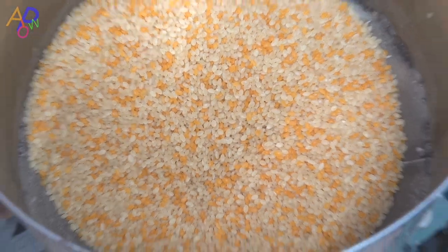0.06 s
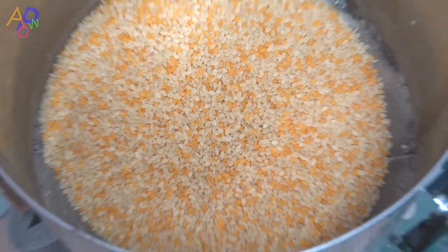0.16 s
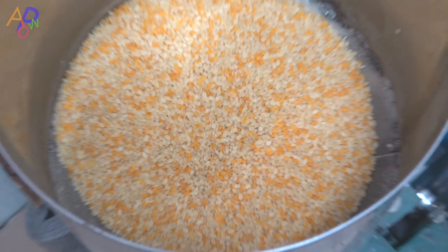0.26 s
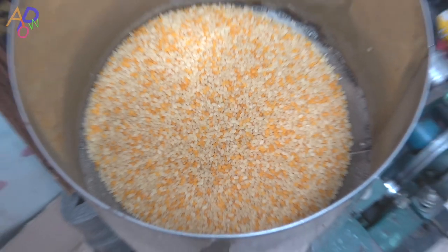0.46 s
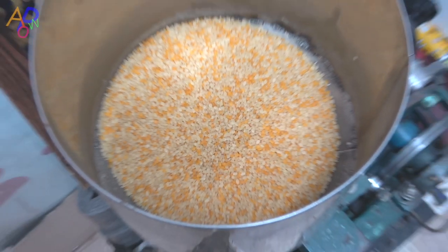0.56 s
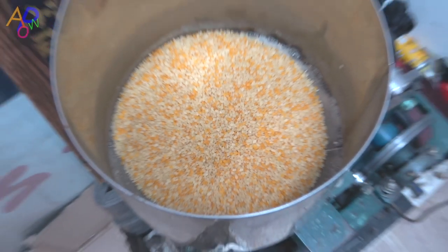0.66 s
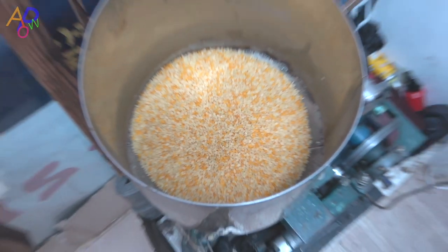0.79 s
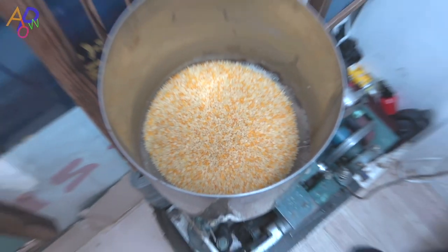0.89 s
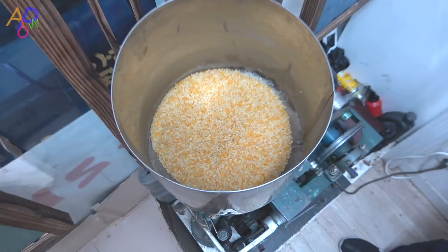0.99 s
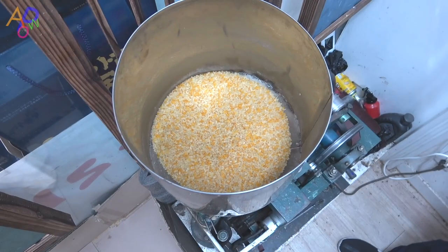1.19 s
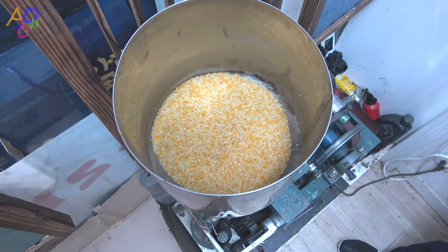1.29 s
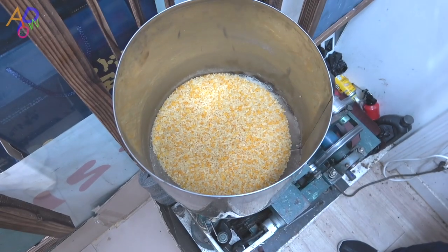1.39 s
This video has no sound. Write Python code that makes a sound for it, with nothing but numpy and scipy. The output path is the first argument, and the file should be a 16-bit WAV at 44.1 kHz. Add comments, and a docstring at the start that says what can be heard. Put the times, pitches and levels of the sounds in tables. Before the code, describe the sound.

In a workshop, something metal bangs against a grain-filled steel hopper, overloading the nearby microphone. The hopper settles with quick thuds and rattles, then a latch clicks, while a motor hums and loose parts tick faintly.

```python
"""Bang on a grain hopper

A steel hopper full of grain stands on a humming electric machine in a workshop. Something metal
bangs against it: the frame booms, the sheet rings and the microphone overloads. The hopper bumps
as it settles, a fitting is tapped and a latch clacks, with faint ticks of loose parts between."""
import sys
import numpy as np
from scipy import signal
from scipy.fft import rfft, irfft, next_fast_len
from scipy.io import wavfile

SR = 44100
rng = np.random.default_rng(int(sys.argv[2]) if len(sys.argv) > 2 else 0)


def store_pcm(level_fs):
    """Save levels as 16-bit WAV."""
    pcm = np.round(np.clip(level_fs, -1, 1) * 32767).astype(np.int16)
    wavfile.write(sys.argv[1], SR, np.atleast_2d(pcm).T)


N = 63945
TIME = np.arange(N) / SR

# Frame modes: pitch_hz, level_db, t60_s
FRAME_MODES = [(88.4, -1, 0.44), (146.36, -8, 0.62), (171.2, -6, 0.23), (199.3, -3, 0.19), (218, -13, 0.66),
               (270.8, -3.5, 0.57), (322.2, -5.5, 0.42), (494.8, -10.5, 0.17), (643.4, -12.5, 0.15)]
# Steel sheet modes: pitch_hz, level_db, t60_s
SHEET_MODES = [(772, -9, 0.32), (872, -8, 0.24), (1157, -6, 0.42), (1497, 1, 0.24), (1680, -10, 0.22),
               (2067, -7, 0.28), (2282, -5, 0.22), (2422, 1, 0.21), (2643, -10, 0.3), (3122, -10, 0.26),
               (3700, -7, 0.2), (4016, -1, 0.2), (4400, -8, 0.2)]
# Hit and rebound on the sheet: start_s, level_db
SHEET_HITS = [(0.2135, -27.5), (0.259, -20.5)]
# Metal-on-metal contact spectrum: freq_hz, density_db
METAL_SPECTRUM = [(300, 0.5), (900, -1.5), (1150, -17), (1500, -6.5), (2300, 1), (3200, 1.5), (3800, 6.5),
                  (5100, -13.5), (6000, -10), (7500, -12.5), (11000, -22), (16000, -19)]


def bang(start_s=0.2115):
    """Metal cracks against the hopper; the frame booms and the sheet rings fully on the rebound."""
    crack = from_db(-2) * noise(METAL_SPECTRUM) * burst(start_s, rise_s=0.0077, t60_s=0.02)
    boom = ring(FRAME_MODES, [(start_s + 0.001513, -3)])
    sheet = ring(SHEET_MODES, SHEET_HITS)
    return crack + boom + sheet + from_db(-5.5) * crash(start_s, rise_s=0.015)


# Dense hopper and room resonances: freq_hz, density_db
CRASH_SPECTRUM = [(40, -32), (90, -3), (280, 4.5), (420, -9.5), (750, -11), (1100, -18.5), (2300, -14.5),
                  (3000, -17.5), (4100, -16), (5500, -25.5), (9000, -32), (16000, -33.5)]
# Their decay times: freq_hz, t60_s
CRASH_DECAY = [(100, 0.82), (300, 0.53), (1200, 0.31), (4000, 0.33), (12000, 0.3)]


def crash(start_s, rise_s):
    """Countless close resonances of hopper and room; the bass lasts longest."""
    rest, out = noise(CRASH_SPECTRUM), 0
    for hz in np.geomspace(150, 12000, 7):
        band = signal.sosfilt(signal.butter(1, hz, fs=SR, output="sos"), rest)
        rest = rest - band
        out += band * burst(start_s, rise_s, at_hz(CRASH_DECAY, hz))
    return out + rest * burst(start_s, rise_s, CRASH_DECAY[-1][1])


# Bumps as the hopper settles, the last one the thud of the latch: start_s, thud_db, frame_db, rattle_db
BUMPS = [(0.26, -4.5, -20.5, -20), (0.323, -32, -15, -19.5), (0.3736, -11.5, -25, -23),
         (0.432, -19, -26, -24.5), (0.679, -22, -33.5, -32), (0.964, -27.5, -34.5, -42)]
# Loaded hopper modes: pitch_hz, level_db, t60_s
HOPPER_MODES = [(172.8, -9, 0.32), (240, 1.5, 0.13), (269.6, -0.5, 0.14), (332, -6.5, 0.075)]
# Dull contact spectrum: freq_hz, density_db
THUD_SPECTRUM = [(40, -38), (90, -16), (170, -3), (260, 1), (400, -10), (650, -14.5), (1300, -43),
                 (6000, -70)]
# Rattle spectrum: freq_hz, density_db
RATTLE_SPECTRUM = [(250, 1), (650, 0.5), (900, -7.5), (1250, 3.5), (1600, -11.5), (3500, -18), (12000, -45)]


def bumps():
    """The hopper settles: each bump thuds, rattles briefly and stirs the frame again; the last bump is the
    latch thudding home."""
    out = ring(FRAME_MODES, [(start_s, db) for start_s, _, db, _ in BUMPS])
    out += ring(HOPPER_MODES, [(start_s, db) for start_s, db, _, _ in BUMPS])
    for start_s, thud_db, _, rattle_db in BUMPS:
        thud = noise(THUD_SPECTRUM) * burst(start_s, rise_s=0.0031, t60_s=0.11)
        rattle = noise(RATTLE_SPECTRUM) * burst(start_s, rise_s=0.005, t60_s=0.05)
        out = out + from_db(thud_db - 1) * thud + from_db(rattle_db) * rattle
    return out


RING_LAG_S = 0.0025
# Latch modes: pitch_hz, level_db, t60_s
LATCH_MODES = [(905, -2.5, 0.045), (2125, -10.5, 0.1), (2282, -10, 0.07), (2557, -9.5, 0.06),
               (3682, -3.5, 0.05), (3962, 1, 0.048)]


def latch(start_s=0.96, snap_db=-19.5, ring_db=-18.5):
    """A small steel latch snaps home and rings briefly."""
    contact = snap(METAL_SPECTRUM, start_s, snap_db)
    return contact + ring(LATCH_MODES, [(start_s + RING_LAG_S, ring_db)])


# Fitting modes: pitch_hz, level_db, t60_s
FITTING_MODES = [(514, -1.5, 0.06), (617, 0, 0.1), (2621, -6.5, 0.07), (3578, 1.5, 0.06), (3950, 0, 0.06),
                 (4650, -11, 0.05)]


def fitting_tap(start_s=0.498, snap_db=-26.5, ring_db=-27.5):
    """A light tap sets a metal fitting ringing, short and hollow."""
    contact = snap(METAL_SPECTRUM, start_s, snap_db)
    return contact + ring(FITTING_MODES, [(start_s + RING_LAG_S, ring_db)])


# Loose part contacts: start_s, level_db
TICKS = [(0.165, -37.5), (0.3693, -25), (0.4245, -35.5), (0.4505, -43), (0.516, -35), (0.521, -37),
         (0.955, -30.5), (1.097, -46), (1.298, -40.5)]
# Tick spectrum: freq_hz, density_db
TICK_SPECTRUM = [(500, 9), (2500, 4.5), (4400, 7), (6000, -8), (9000, -10.5), (16000, -19)]


def ticks():
    """Loose parts touch: short, bright and without pitch."""
    return sum(snap(TICK_SPECTRUM, start_s, db) for start_s, db in TICKS)


# Motor and mains hum lines: pitch_hz, level_db
HUM_LINES = [(119.6, -35.5), (178, -48), (240, -40), (270, -46), (360.3, -43), (479, -49), (640, -54.5)]
# Running noise spectrum: freq_hz, density_db
WHIR_SPECTRUM = [(25, -40), (45, -18), (68, -7), (100, -3), (150, -3.5), (260, -6), (330, -8), (420, -9),
                 (620, -14), (950, -22.5), (1700, -25), (2150, -21), (2500, -21.5), (3300, -30.5),
                 (4100, -22), (5200, -41), (8000, -42), (10500, -51), (16000, -52)]


def machine(waver_db=1.2, whine_hz=2772, whine_width_hz=51):
    """Wavering motor and mains hum, a narrow bearing whine and broad running noise."""
    hum = 0
    for hz, db in HUM_LINES:
        amplitude = np.sqrt(2) * from_db(db + waver_db * drift(rate_hz=4.8))
        hum += amplitude * np.sin(2 * np.pi * (hz * TIME + rng.random()))
    phase = 2 * np.pi * whine_hz * TIME
    whine = drift(whine_width_hz) * np.sin(phase) + drift(whine_width_hz) * np.cos(phase)
    return hum + from_db(-48.5) * whine + from_db(-34.5) * noise(WHIR_SPECTRUM)


# Rumble envelope: time_s, level_db
RUMBLE_LEVELS = [(0, -46), (0.2, -41), (0.6, -40), (0.9, -51.5), (0.98, -33), (1.1, -47), (1.3, -34),
                 (1.45, -52)]
# Rumble spectrum: freq_hz, density_db
RUMBLE_SPECTRUM = [(25, -30), (48, -17), (68, -2.5), (90, -11), (140, -13), (400, -85)]


def rumble():
    """A low rumble comes and goes under the hum."""
    level_db = np.interp(TIME, *np.transpose(RUMBLE_LEVELS))
    return from_db(level_db) * noise(RUMBLE_SPECTRUM)


def ring(modes, blows, uneven_db=2.0):
    """Blows (start_s, level_db) strike every damped mode, each with slightly uneven strength."""
    start_s, blow_db = np.transpose(blows)
    out = np.zeros(N)
    for k, (hz, mode_db, t60_s) in enumerate(modes):
        strength = from_db(blow_db + mode_db + uneven_db * rng.standard_normal(len(blows)))
        impulses = np.full(N, 1e-18)
        np.add.at(impulses, (start_s * SR).astype(int), strength)
        r, w = decay(1 / SR, t60_s), 2 * np.pi * hz / SR
        out += (-1) ** k * signal.lfilter([0, np.sin(w)], [1, -2 * r * np.cos(w), r * r], impulses)
    return out


def snap(spectrum, start_s, level_db, rise_s=0.0026):
    """A hard little contact with its short tail in the room."""
    direct = burst(start_s, rise_s, t60_s=0.027)
    room = from_db(-14) * burst(start_s, rise_s, t60_s=0.17)
    return from_db(level_db) * noise(spectrum) * (direct + room)


# Diffuse share of the sound: freq_hz, side_db
DIFFUSE_SHARE = [(60, -22), (300, -26), (700, -13.5), (2500, -13), (9000, -14)]


def noise(spectrum, ripple_db=2.5, ripple_width_hz=22):
    """Coloured stereo noise at unit rms, rippled by reflections and more diffuse in the treble."""
    size = next_fast_len(N)
    hz = np.arange(size // 2 + 1) * SR / size
    ripple = np.interp(hz / ripple_width_hz, np.arange(size), rng.standard_normal(size))
    colour = from_db(at_hz(spectrum, hz) + ripple_db * ripple)
    mid, side = rfft(rng.standard_normal((2, size))) * colour
    side *= from_db(at_hz(DIFFUSE_SHARE, hz))
    return unit_rms(irfft(np.array([mid + side, mid - side]), size)[:, :N])


def drift(rate_hz):
    """Smooth random wander at unit rms."""
    r = np.exp(-2 * np.pi * rate_hz / SR)
    return unit_rms(signal.lfilter([1], [1, -2 * r, r * r], rng.standard_normal(N + SR))[SR:])


def burst(start_s, rise_s, t60_s):
    """Contact envelope: linear rise, exponential fall."""
    age_s = TIME - start_s
    return np.clip(age_s / rise_s, 0, 1) * decay(age_s - rise_s, t60_s)


def decay(age_s, t60_s):
    """Exponential fall, 60 dB per t60_s."""
    return np.exp(-np.log(1000) * np.maximum(age_s, 0) / t60_s)


def at_hz(table, hz):
    """Interpolate on a log-frequency axis."""
    freq_hz, values = np.transpose(table)
    return np.interp(np.log(np.maximum(hz, 1)), np.log(freq_hz), values)


def from_db(db):
    """Decibels to gain."""
    return 10 ** (np.asarray(db) / 20)


def unit_rms(x):
    """Scale to unit rms."""
    return x / np.sqrt(np.mean(x ** 2) + 1e-20)


def pan(left_db):
    """Stereo gains for a left-minus-right level difference."""
    return from_db(np.array([[left_db], [-left_db]]) / 2)


def scene():
    """Impacts over the running machine, all to the left of the microphone."""
    background = machine() + rumble()
    impacts = bang() + bumps() + fitting_tap() + latch() + ticks()
    return pan(left_db=10) * impacts + pan(left_db=9) * background


def record(dry):
    """The microphone clips softly; gain control ducks and slowly recovers; the top is cut."""
    ceiling, knee = 0.88, 2.2
    highpass_hz, lowpass_hz = 38.6, 15750
    limit_db, attack_s, release_db_per_s = -3, 0.0018, 4
    clipped = dry / (1 + np.abs(dry / ceiling) ** knee) ** (1 / knee)
    # Bass roll-off tilts the flat tops.
    tilted = signal.sosfilt(signal.butter(1, highpass_hz, "high", fs=SR, output="sos"), clipped)
    peak_db = 20 * np.log10(np.abs(tilted).max(axis=0) + 1e-9)
    over_db = np.maximum(peak_db - limit_db, 0)
    release_db = release_db_per_s * TIME
    held_db = np.maximum.accumulate(over_db + release_db) - release_db
    r = np.exp(-1 / (attack_s * SR))
    ducked = tilted * from_db(-signal.lfilter([1 - r], [1, -r], held_db))
    return signal.sosfilt(signal.ellip(10, 0.1, 80, lowpass_hz, fs=SR, output="sos"), ducked)


dry = scene()
out = record(dry)
store_pcm(out)
```